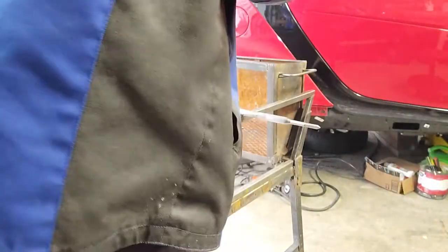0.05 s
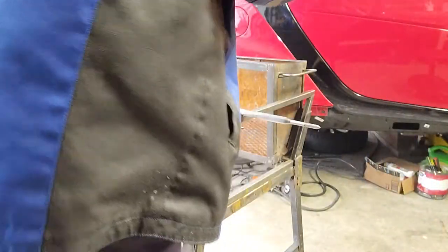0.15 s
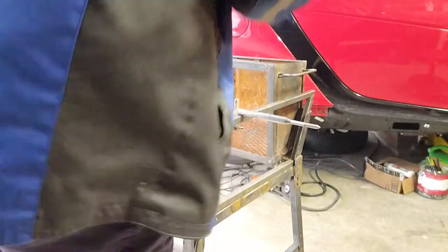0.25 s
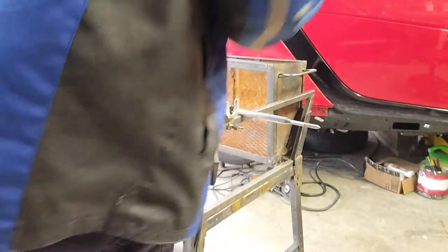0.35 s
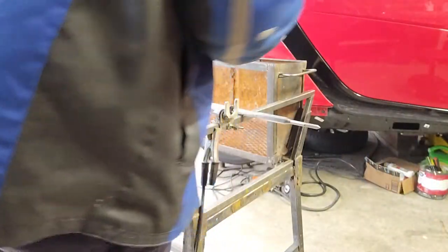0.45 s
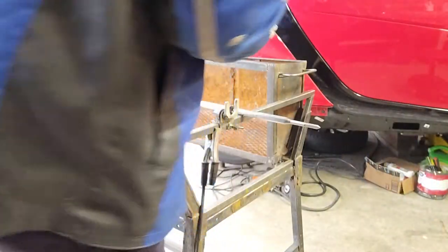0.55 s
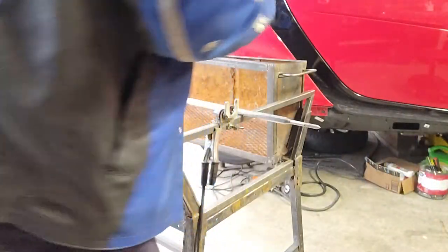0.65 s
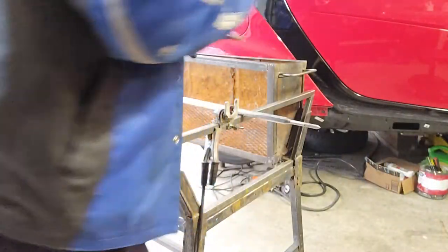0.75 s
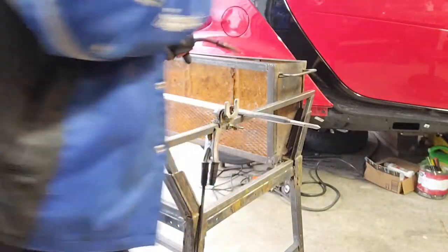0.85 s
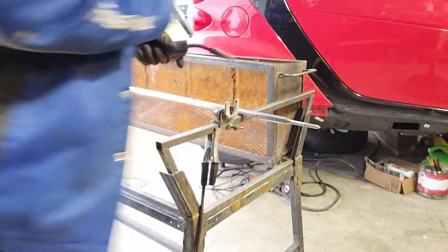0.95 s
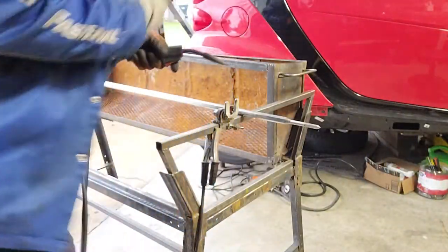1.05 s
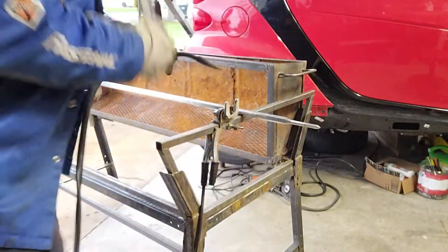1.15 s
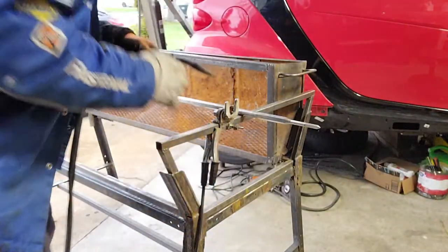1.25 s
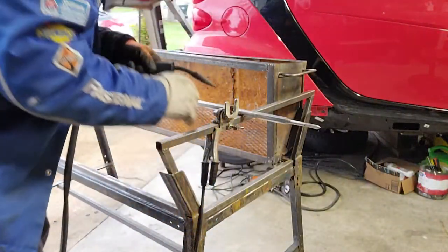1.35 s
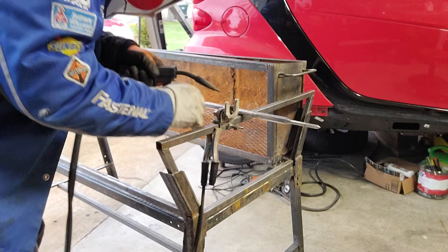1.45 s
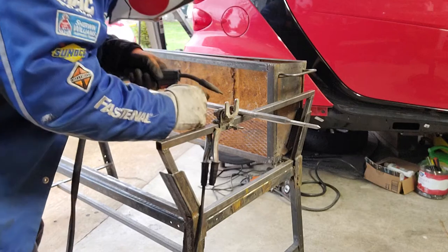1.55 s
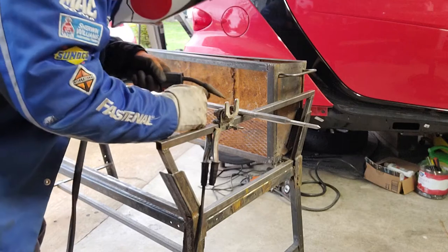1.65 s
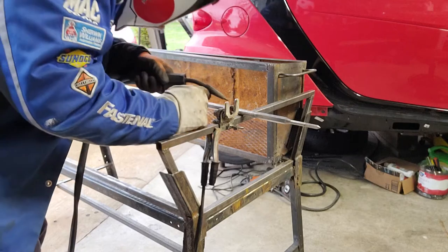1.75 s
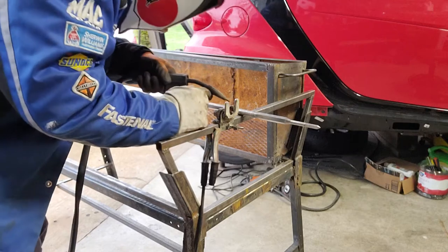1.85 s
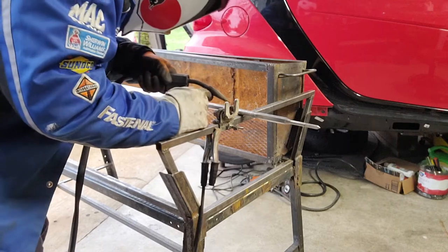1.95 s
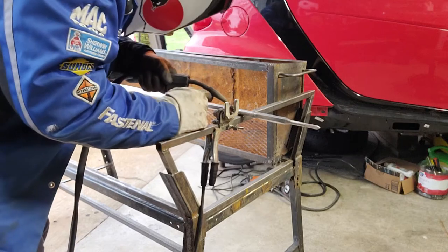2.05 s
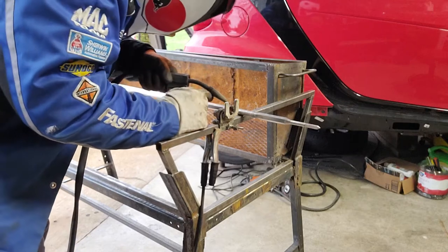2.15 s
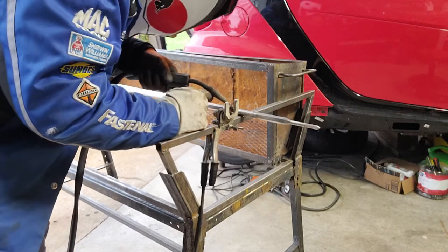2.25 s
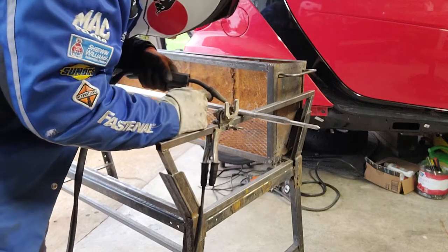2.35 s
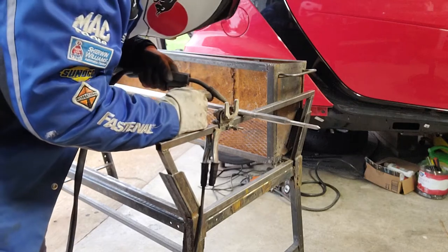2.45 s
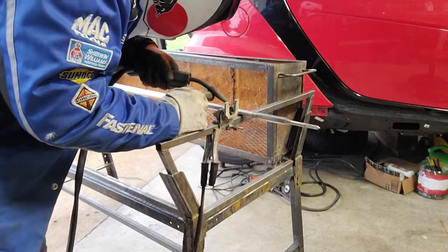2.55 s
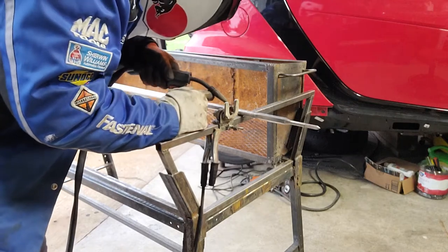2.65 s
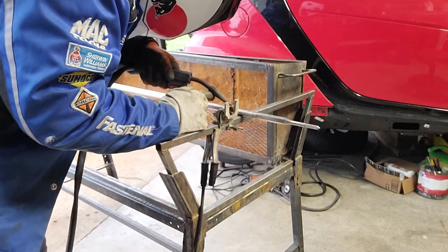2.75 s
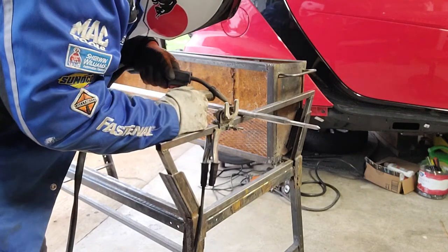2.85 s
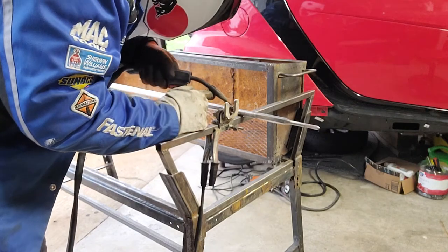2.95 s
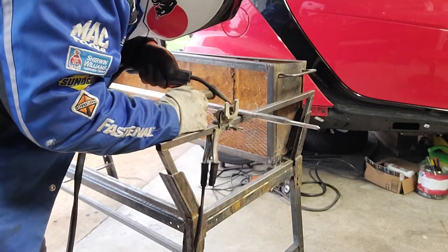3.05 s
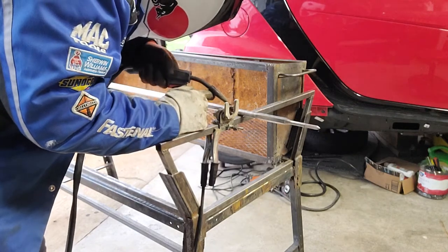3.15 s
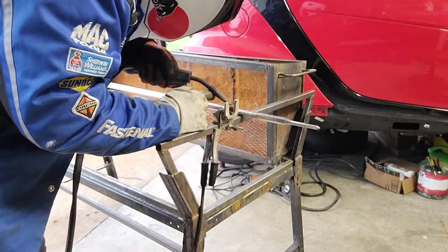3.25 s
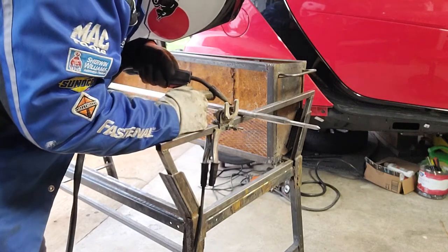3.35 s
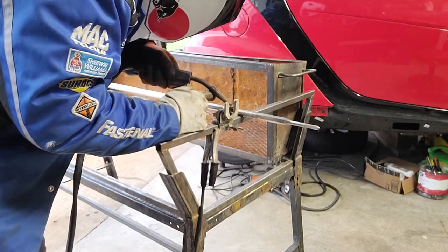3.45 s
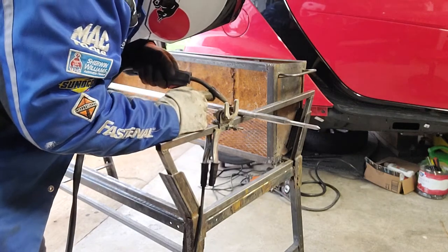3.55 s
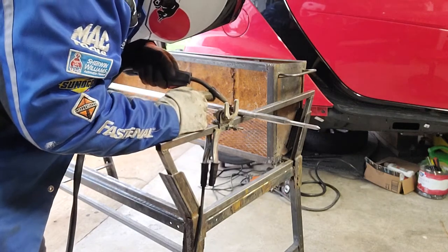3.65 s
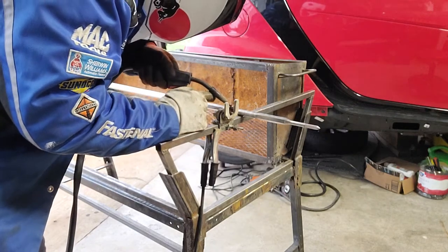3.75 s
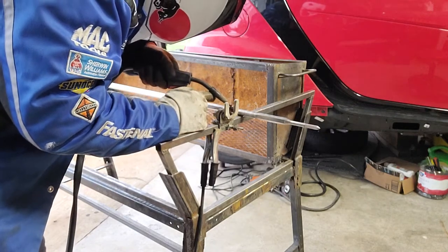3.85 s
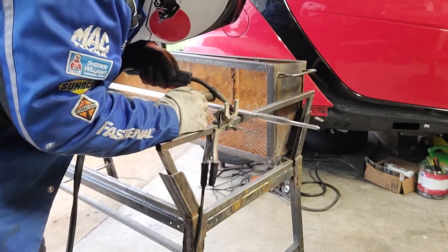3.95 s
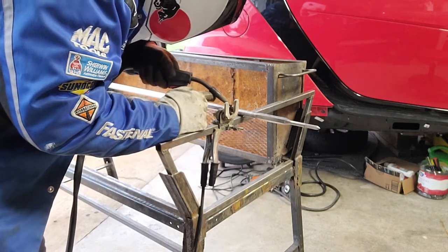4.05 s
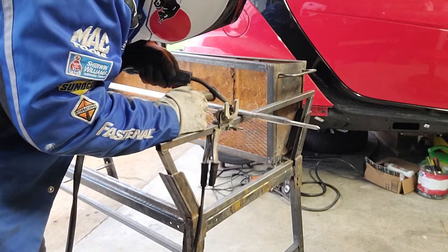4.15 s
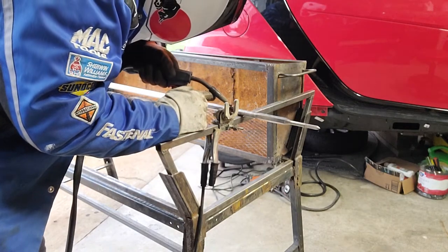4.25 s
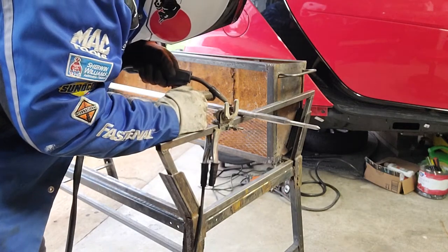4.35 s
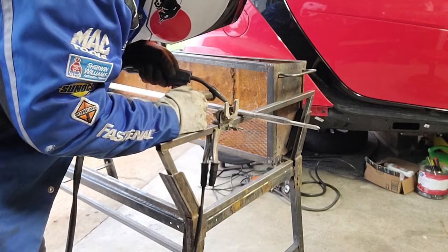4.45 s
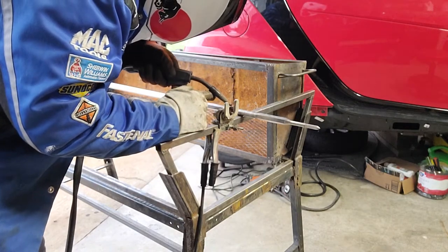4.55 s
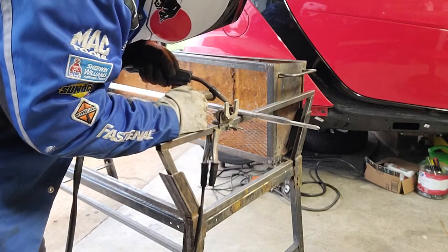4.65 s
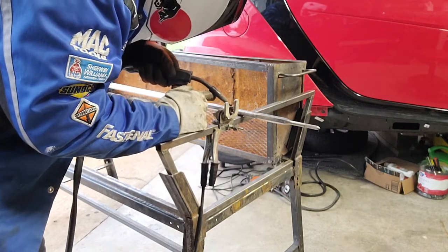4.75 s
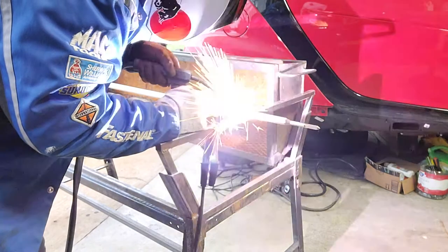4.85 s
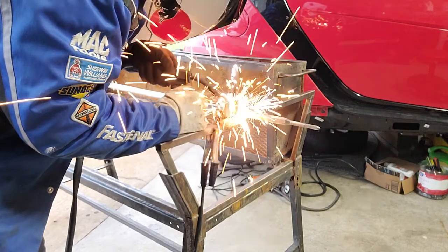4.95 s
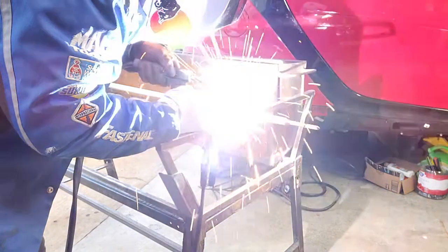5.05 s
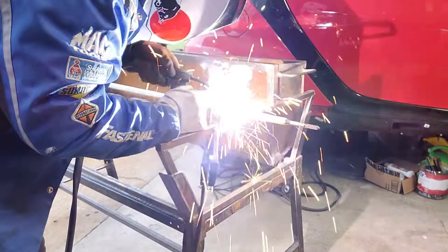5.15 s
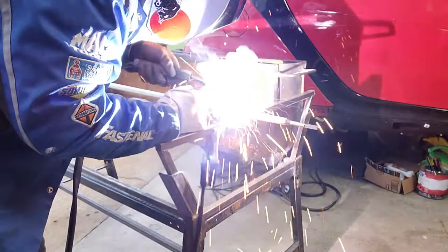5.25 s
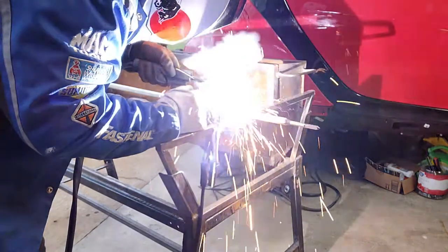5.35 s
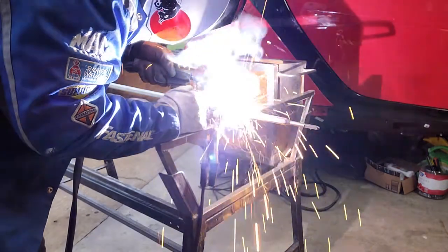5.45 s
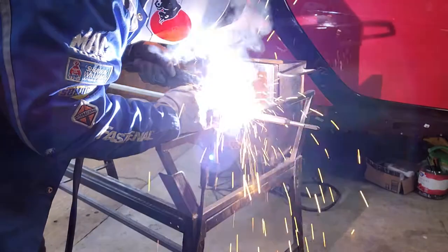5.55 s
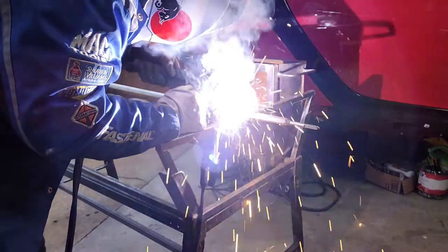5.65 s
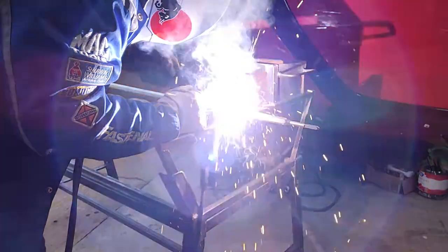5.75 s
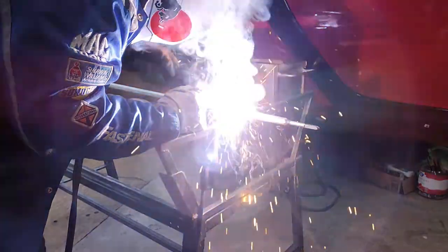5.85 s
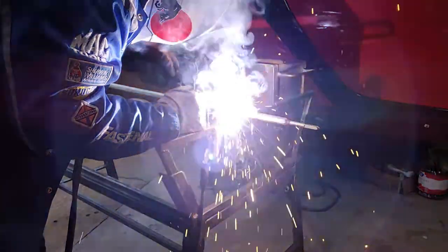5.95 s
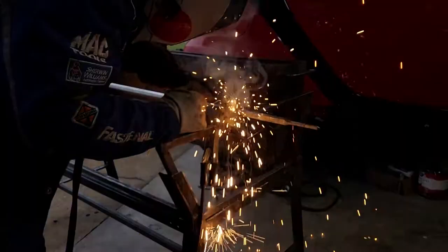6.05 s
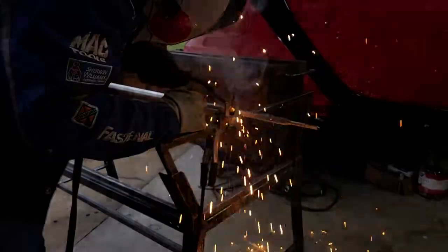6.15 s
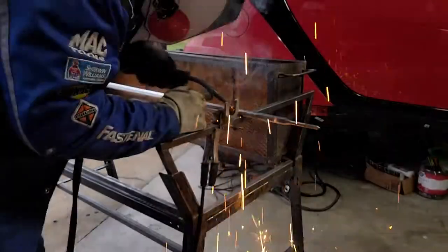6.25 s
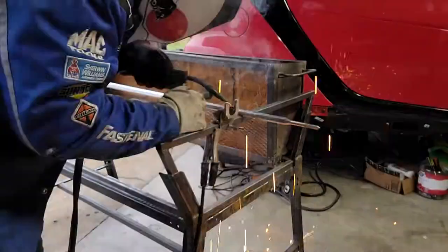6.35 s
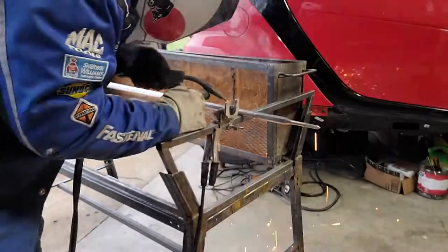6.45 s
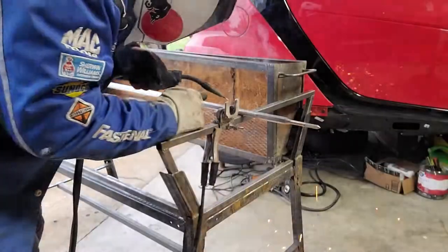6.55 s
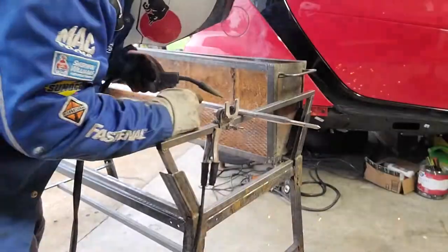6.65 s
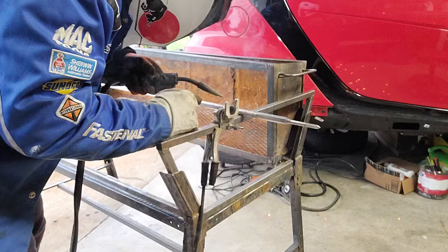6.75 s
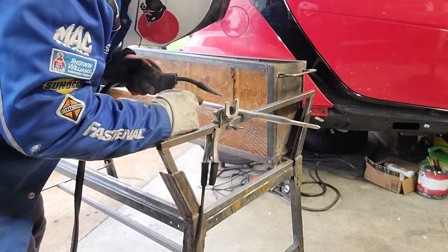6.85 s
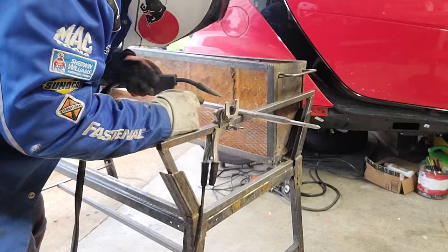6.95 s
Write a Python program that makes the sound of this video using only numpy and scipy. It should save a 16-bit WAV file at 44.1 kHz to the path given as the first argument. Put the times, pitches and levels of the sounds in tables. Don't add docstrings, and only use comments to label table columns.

```python
import sys
import numpy as np
from scipy import signal
from scipy.fft import rfft, irfft, next_fast_len
from scipy.io import wavfile
from scipy.ndimage import uniform_filter1d

SR = 44100
rng = np.random.default_rng(int(sys.argv[2]) if len(sys.argv) > 2 else 0)


def to_wav(s):
    ch = np.atleast_2d(s).T
    pcm = np.round(np.clip(ch, -1, 1) * 32767)
    wavfile.write(sys.argv[1], SR, pcm.astype(np.int16))


def gain_from_db(level_db):
    decades = np.asarray(level_db, float) / 20
    return 10 ** decades


N = 308259

# (time [s], level [dB])
PHONE_GAIN = [
    (0, 1.5),
    (4.85, 1),
    (4.9, 1),
    (5.4, -2.5),
    (6.05, -6),
    (6.99, -4.5),
]
HISS_DB = -66.5
# (time [s], level [dB], upper part relative [dB])
FLOOR_RUMBLE = [
    (0, -58, 1.5),
    (1.3, -52.5, 3),
    (3.6, -60.5, 9.5),
    (4.3, -67, 1),
    (4.7, -67, 2),
    (5.3, -52, 3),
    (6.04, -58.5, 15),
    (6.1, -60, -1),
    (6.99, -71, -5),
]
# (start [s], rise [s], fall
# [s], peak level [dB], upper part relative [dB])
PHONE_JOLTS = [(-.02, 0.017, 0.066, -42, -6), (.2, 0.015, 0.3, -41, -9), (.72, 0.02, 0.093, -47, 11.5),
               (.83, 0.031, 0.14, -52, 17.5), (1.15, 0.032, 0.096, -54, -12), (1.66, 0.027, 0.07, -57, -4),
               (2.02, 0.02, 0.086, -47, 11), (4.28, 0.053, .25, -45, 3.5), (4.66, 0.027, 0.14, -52, 9),
               (4.72, 0.045, 0.25, -41, 3.5), (5.04, 0.045, 0.083, -41, 8), (5.36, 0.014, 0.13, -55, 20.5),
               (5.83, 0.041, 0.12, -57.5, 24.5), (5.99, 0.025, 0.097, -44, -18),
               (6.91, 0.026, .3, -39.5, 1.5)]

ROOM_T60_S, ROOM_DB = .25, -5

SHAFT_HZ = 74.09
FAN_ORDERS = [1, 2, 3, 4, 7, 14, 21, 24, 28, 20, 35, 42, 49, 56, 63]
# (level [dB], left minus right [dB], left lag [ms])
FAN_TONES = [(-64, 0, .3), (-66, 0, .1), (-60.5, 0, .45), (-54, -2, .33), (-64, -5, .5), (-49, -1.5, .41),
             (-55.5, -2, .59), (-53, 4, .54), (-59, 2, .5), (-64, -8, .39), (-72, 2, .55), (-78, 0, .55),
             (-72, 2, .53), (-75, 2, .5), (-77, 2, .52)]
# (time [s], extra lag [ms], negative is shorter)
PASSING_BODY = [
    (0, -.04),
    (.5, -.07),
    (.8, -.06),
    (1.1, 0),
    (6.99, 0),
]
BOUNCE_HZ, BOUNCE_WIDTH_HZ, BOUNCE_DB_PER_MS = 1040, 150, -42
# (frequency [Hz], density [dB per Hz])
AIR_COLOUR = [(15, -85), (25, 0), (182, -13), (304, -0.5), (669, -5.5), (1030, -5.5), (1120, -13),
              (1400, -10), (1780, -14.5), (1930, -18), (2400, -19), (2900, -20), (3600, -22), (4700, -23),
              (6500, -26.5), (9330, -33.5), (15200, -28.5), (16500, -38)]
# (frequency [Hz], left minus right [dB])
AIR_PAN = [(60, -1.5), (110, -1.0), (200, -1.0), (380, -2.0), (700, -3.0), (1290, -2.0), (2380, 1.5),
           (4400, -0.5), (8120, -2.5), (15000, -7.5)]
# (frequency [Hz], share [0-1])
AIR_DIRECT = [(30, .99), (150, .97), (300, .9), (700, .7), (2000, .5), (5000, .35), (15000, .4)]
AIR_DB, FAN_LAG_MS = -43, 0.499

# (start [s], rise [s],
# fall [s], peak level [dB], brightness [0 thud - 3 hiss])
SCUFFS = [(.135, .012, 0.034, -46.5, 2.35), (.185, 0.015, 0.13, -45.5, 2.43), (.826, .003, 0.03, -39, 2.5),
          (.83, 0.024, 0.065, -31.5, 0.23), (.84, 0.02, 0.06, -43, 1.3), (.952, 0.024, 0.042, -42.5, 2.65),
          (.995, 0.026, 0.22, -46.5, 2.53), (1.017, .003, 0.026, -38.5, 1.1),
          (1.1065, 0.002, 0.044, -35, 2.42), (1.11, 0.054, 0.096, -32.5, 2.27),
          (1.118, 0.019, 0.06, -42, 0.85), (4.77, 0.068, .02, -40.5, 1.2), (6.654, .004, 0.028, -52.5, 2.8)]
# (frequency [Hz], width [Hz])
SOLE_RINGS = [(550, 670), (1900, 1400), (3600, 6400), (11500, 11600)]
# (frequency [Hz], width [Hz], level [dB])
SQUEAK_RINGS = [(1580, 120, -3), (2010, 130, 0), (2630, 180, -6), (3060, 170, -9)]
SQUEAK_S, SQUEAK_RISE_S, SQUEAK_FALL_S, SQUEAK_DB = 1.12, 0.019, 0.068, -29.5
# (time [s], peak level [dB], pitch [Hz], decay t60 [s], tick relative [dB])
KNOCKS = [(0.213, -30.5, 204, 0.077, -7), (0.232, -25, 135, 0.016, -7), (0.326, -31.5, 142, 0.03, -6),
          (0.394, -48, 380, 0.034, -3), (0.827, -35.5, 440, 0.072, 8.5), (.836, -35, 600, .04, -2),
          (.867, -34, 730, 0.031, -8), (0.8516, -20, 620, 0.01, -19), (0.858, -29, 457, 0.028, -19),
          (1.018, -33, 796, 0.04, -3), (1.0205, -27, 570, .015, -15), (1.025, -31, 467, 0.06, -10),
          (1.034, -30, 380, 0.015, -15), (1.1071, -35, 500, 0.02, 5), (1.1138, -34, 300, 0.031, -10),
          (1.1345, -27, 2010, .04, -10), (1.141, -27, 1570, .03, -10), (4.672, -36, 230, 0.044, -20),
          (4.677, -32, 139, 0.12, -15), (4.816, -35.5, 305, 0.047, 2), (6.925, -33.5, 59, 0.39, -30),
          (.001, -36, 62.6, .3, -30), (.235, -40, 50, .3, -30), (.388, -38, 70, 0.071, -30),
          (.222, -35, 240, .05, -20), (0.878, -38, 420, .04, -15), (4.77, -39, 75, .15, -30)]
OFF_RING_DB, CONTACT_DB, FALL_DB, FALL_BEND = -9.5, -9, -20.5, 1.48

# (time [s], sizzle level [dB], sag [dB per s], body level [dB])
STRIKES = [(4.852, -19, 260, -36), (4.877, -27, 120, -46), (4.904, -22.5, 236, -32), (4.967, -31, 384, -40),
           (5.0288, -36, 250, -34.5), (5.045, -24.5, -700, -36), (5.059, -22, 150, -31),
           (5.134, -26.5, 148, -32), (5.208, -24.5, 52, -37), (5.265, -26.5, 27, -36.5),
           (5.367, -26, 107, -35.5), (5.42, -27, 250, -38.5), (5.446, -25.5, 9, -35.5),
           (5.514, -26.5, 123, -34), (5.55, -22.5, 600, -44), (5.565, -29, 60, -44), (5.592, -26, 100, -37),
           (5.622, -24, 5, -38.5), (5.638, -25.5, 216, -35.5), (5.692, -25, -40, -37),
           (5.745, -26, 100, -34), (5.778, -32, 77, -33.5), (5.848, -28, 18, -35), (5.904, -25, 66, -33.5),
           (5.955, -29, 5, -32.5), (5.991, -27, 32, -35.5)]
ARC_OFF_S, BODY_OFF_S, FLARE_S = 6.036, 6.03, 0.0021
BODY_SAG = 0.64
CHOKE_DB, CHOKE_S = 2, 0.0089
# (frequency [Hz], level [dB])
SIZZLE_COLOUR = [(1500, -38), (4000, -11.5), (5500, -6), (7400, -3.5), (9000, -7.5), (12000, 1), (14500, 0),
                 (15600, 8), (16500, -16)]
# (frequency [Hz], level [dB])
BODY_COLOUR = [(60, -25.5), (150, -6), (300, 0), (450, -11), (680, -3.5), (950, -2.5), (1100, -8.5),
               (1230, -1.5), (1360, -9), (1500, -0.5), (1860, -5), (2300, -3), (2700, -5.5), (4000, -5.5),
               (8000, -17.5)]
# (time [s], level [dB])
SPITS = [(4.8539, -9), (4.8772, -14.5), (4.887, -15.0), (4.8997, -17), (4.9076, -17), (4.9179, -16.0),
         (4.9686, -15.0), (5.0113, -35), (5.0292, -27), (5.0456, -18), (5.1382, -20.0), (5.166, -14),
         (5.2018, -20.0), (5.2088, -13), (5.2274, -17.0), (5.2393, -15), (5.2646, -20), (5.2686, -17.5),
         (5.287, -17.5), (5.2994, -15), (5.3247, -19), (5.3452, -17.0), (5.3513, -18), (5.3678, -9),
         (5.3744, -10), (5.3877, -16), (5.4005, -19), (5.42, -14), (5.4244, -14.0), (5.444, -15),
         (5.4524, -18), (5.4618, -18), (5.4682, -14.0), (5.4841, -14), (5.51, -14.0), (5.552, -15.0),
         (5.5618, -14), (5.586, -16.0), (5.6106, -18), (5.6227, -23), (5.6481, -15.5), (5.679, -19),
         (5.6913, -18), (5.7021, -12), (5.7117, -16), (5.7297, -15.0), (5.752, -19), (5.7585, -15.0),
         (5.7727, -19), (5.78, -21), (5.7952, -18.5), (5.8183, -17), (5.8348, -16.0), (5.8489, -16.5),
         (5.887, -15), (5.9019, -16), (5.9584, -22), (5.9668, -18.0), (6.016, -17.0), (6.0266, -18.0)]
SPIT_DB, SPIT_S, SPIT_BODY_DB = -5.5, .0005, -10
# (time [s], peak level [dB], thump relative [dB])
CRACKS = [(4.8523, -14, 11), (4.8543, -1, -12), (4.8772, -10, -13), (4.9, -10, -9), (4.9184, -15, -7),
          (4.969, -1, -6.5), (5.0461, -17, -18), (5.0665, -16, -23), (5.2096, -12, -7), (5.2396, -22, -19),
          (5.2689, -18, -19), (5.3517, -10, -6), (5.3681, -4, -4), (5.3749, -9, -1.5), (5.3883, -21, -17),
          (5.4009, -24, -22), (5.4201, -8, -21), (5.4248, -4, -16), (5.4448, -5, -25), (5.4686, -20, -20),
          (5.5528, -14, -25), (5.5621, -7, -13), (5.6485, -6, -23), (5.6917, -2, -28), (5.7116, -12, -21),
          (5.7299, -4, -8.5), (5.759, 0, -19), (5.7955, -13, -16), (5.8185, -5, -20), (5.8491, -7, -10)]
# (time [s], peak level [dB], thump relative [dB], left minus right
# [dB])
POPS = [
    (4.9115, -9, -23, 24),
    (4.9684, -23, -14, 5),
    (5.029, -13, -4, 5),
    (5.139, -10, -1.5, 8),
    (5.1614, -5, -11, 4),
    (5.9264, -4, -21, 5),
    (6.026, -3, -31, 2),
    (5.057, -19, -17, 6),
    (5.5966, -11, -12, 4),
    (5.7013, -18, -12, 3),
]
# (frequency [Hz], level [dB])
SNAP_COLOUR = [(800, -30), (3000, -8.5), (6500, 0), (9000, -1.5), (15000, 6.5), (16500, -15)]
DROPS, DROP_OVER_DB, DROP_THUMP_DB, DROP_PAN_DB = 23, 11, -10.5, 3
# (left delay [ms], right delay [ms], level [dB])
FRAME_ECHOES = [
    (.27, 0.396, -11),
    (.8, 0.65, -35),
    (1.9, 2.3, -10.5),
    (3.1, 2.5, -6),
]


def colour(x, table):
    hz, db = np.transpose(table)
    size = 2048
    log_hz = np.log(np.linspace(1, SR / 2, size // 2 + 1))
    log_gain = np.interp(log_hz, np.log(hz), db) * np.log(10) / 20
    ceps = irfft(log_gain)
    ceps[1:size // 2] *= 2
    ceps[size // 2 + 1:] = 0
    impulse = irfft(np.exp(rfft(ceps)))
    return signal.fftconvolve(np.atleast_2d(x), impulse[None], axes=1)[:, :N]


def band(x, hz, width):
    return signal.lfilter(*signal.iirpeak(hz, hz / width, SR), x)


def unit(x):
    return x / np.sqrt(np.mean(x ** 2))


def delay(x, ms):
    size = next_fast_len(N)
    turn = np.exp(-2j * np.pi * np.fft.rfftfreq(size, 1 / SR) * ms / 1000)
    return irfft(rfft(x, size) * turn, size)[:N]


def walk(rate):
    k = int(SR / rate)
    steps = np.repeat(rng.standard_normal(N // k + 1), k)
    return unit(uniform_filter1d(uniform_filter1d(steps, k), k)[:N])


def grains(rate, spread_db, channels=1):
    hit = rng.random((channels, N)) < rate / SR
    size = np.minimum(rng.exponential(size=(channels, N)), 2.5)
    return unit(hit * rng.choice([-1, 1], (channels, N)) * gain_from_db(spread_db * size))


def curve(table):
    s, *columns = np.transpose(table)
    return [np.interp(np.arange(N) / SR, s, c) for c in columns]


def swell(s, rise, fall):
    out, first = np.zeros(N), max(int(s * SR), 0)
    t = np.arange(first, min(first + int((rise + 3 * fall) * SR), N)) / SR - s
    rise_db = CONTACT_DB * np.clip(1 - t / rise, 0, 1)
    fall_db = FALL_DB * np.clip((t - rise) / fall, 0, 9) ** FALL_BEND
    out[first:first + len(t)] = np.clip(t / 0.00061, 0, 1) * gain_from_db(rise_db + fall_db)
    return out


def room(x):
    t = np.arange(int(.4 * SR)) / SR
    common, apart = rng.standard_normal((2, len(t)))
    apart = signal.sosfilt(signal.butter(2, 400, "high", fs=SR, output="sos"), apart)
    tail = np.array([common + apart, common - apart]) * gain_from_db(-60 * t / ROOM_T60_S) * (t > .0015)
    tail *= gain_from_db(ROOM_DB) / np.sqrt(np.sum(tail ** 2, axis=1, keepdims=True))
    return signal.fftconvolve(tail, x[None], axes=1)[:, :N]


def electronic_hiss():
    noise = rng.standard_normal((2, N))
    return gain_from_db(HISS_DB + np.array([[-3], [3]])) * unit(band(noise, 10800, 2500))


def rumble():
    shake = rng.standard_normal(N) + 0.5 * rng.standard_normal((2, N))
    deep = unit(band(band(shake, 74.0, 100), 74.0, 100))
    upper = unit(band(band(shake, 207, 380), 207, 380))
    db, upper_db = curve(FLOOR_RUMBLE)
    out = gain_from_db(db + 2.2 * walk(6.25)) * (deep + gain_from_db(upper_db - 6) * upper)
    for s, rise, fall, db, upper_db in PHONE_JOLTS:
        out = out + swell(s, rise, fall) * gain_from_db(db) * (deep + gain_from_db(upper_db - 9.0) * upper)
    return out * gain_from_db(np.array([[-.7], [.7]]))


def fan_tones():
    turns = np.cumsum(SHAFT_HZ * (1 + .0004 * walk(1.5))) / SR
    extra_ms, = curve(PASSING_BODY)
    out = np.zeros((2, N))
    for order, (db, pan_db, lag_ms) in zip(FAN_ORDERS, FAN_TONES):
        hz = order * SHAFT_HZ
        left_lag = np.array([[1], [0]]) * hz * (lag_ms + extra_ms) / 1000
        phase = order * turns + rng.random() - left_lag
        wobble_db = (1.3 + 0.032 * order) * np.array([walk(3.79), walk(3.99)])
        bounce_db = BOUNCE_DB_PER_MS * extra_ms * np.exp(-((hz - BOUNCE_HZ) / BOUNCE_WIDTH_HZ) ** 2)
        sides_db = np.array([[pan_db], [-pan_db]]) / 2
        out += np.sqrt(2) * gain_from_db(db + bounce_db + wobble_db + sides_db) * np.sin(2 * np.pi * phase)
    return out


def fan_air():
    hz, share = np.transpose(AIR_DIRECT)
    share = np.clip(share, .01, .99)
    same = rng.standard_normal(N)
    direct = colour([delay(same, FAN_LAG_MS), same], np.c_[hz, 10 * np.log10(share)])
    diffuse = colour(rng.standard_normal((2, N)), np.c_[hz, 10 * np.log10(1 - share)])
    left, right = colour(direct + diffuse, AIR_COLOUR)
    left = colour(left, np.multiply(AIR_PAN, [1, .5]))
    right = colour(right, np.multiply(AIR_PAN, [1, -.5]))
    air = np.vstack([left, right])
    air = air + gain_from_db(1.5) * room(air.mean(axis=0))
    return unit(air) * gain_from_db(AIR_DB + 0.18 * walk(2.23))


def scuffs():
    grit = grains(5000, 1.6, channels=2)
    grit = grit + 0.063 * grit[::-1]
    rings = [unit(band(band(grit, hz, width), hz, width)) for hz, width in SOLE_RINGS]
    out = np.zeros((2, N))
    for s, rise, fall, db, bright in SCUFFS:
        drag = sum(gain_from_db(db + OFF_RING_DB * abs(k - bright)) * ring for k, ring in enumerate(rings))
        out += swell(s, rise, fall) * drag
    squeak = unit(sum(gain_from_db(db) * unit(band(grit, hz, width)) for hz, width, db in SQUEAK_RINGS))
    out += gain_from_db(SQUEAK_DB) * swell(SQUEAK_S, SQUEAK_RISE_S, SQUEAK_FALL_S) * squeak
    return out * gain_from_db(np.array([[1.5], [-1.5]]))


def knocks():
    length = 8192
    out, t = np.zeros(N + length), np.arange(length) / SR
    for s, db, hz, t60, tick_db in KNOCKS:
        decay_db = -60 * t / t60
        ring = np.sin(2 * np.pi * hz * t)
        ring += .5 * np.sin(2 * np.pi * 2.17 * hz * t) * gain_from_db(decay_db)
        ring += gain_from_db(tick_db) * rng.standard_normal(length) * np.exp(-t / 0.0022)
        first = int(s * SR)
        out[first:first + length] += gain_from_db(db + decay_db) * ring
    out = colour(out[:N], [(100, 3.5), (2500, 3), (6000, -14.5), (16000, -22)])[0]
    return out + gain_from_db(2.5) * room(out)


def nearby(x, pan_db):
    left = x + sum(gain_from_db(db) * delay(x, ms) for ms, _, db in FRAME_ECHOES)
    right = delay(x, 0.033) + sum(gain_from_db(db) * delay(x, ms) for _, ms, db in FRAME_ECHOES)
    return np.array([left * gain_from_db(pan_db / 2), right * gain_from_db(-pan_db / 2)])


def arc_levels():
    t = np.arange(N) / SR
    start, flare_db, sag, base_db = np.transpose(STRIKES)
    now = np.clip(np.searchsorted(start, t) - 1, 0, None)
    to_next_s = np.abs(np.append(start[1:], np.inf)[now] - t)
    fallen_db = sag[now] * np.clip(t - start[now], 0, .2)
    fallen_db += CHOKE_DB * np.exp(-to_next_s / CHOKE_S)
    levels = [flare_db[now] - fallen_db, base_db[now] - BODY_SAG * fallen_db]
    return uniform_filter1d(levels, int(FLARE_S * SR))


def arc_gate(off_s):
    t = np.arange(N) / SR
    return np.clip(np.minimum(t - STRIKES[0][0], off_s - t) / 0.00092, 0, 1)


def spit_flares():
    s, db = np.transpose(SPITS)
    hits = np.zeros(N)
    hits[(s * SR).astype(int)] = gain_from_db(db + SPIT_DB)
    keep = np.exp(-1 / (SPIT_S * SR))
    return signal.lfilter([np.e * (1 - keep)], np.convolve([1, -keep], [1, -keep]), hits)


def droplet_bursts(sizzle_db):
    when, size, dull = rng.random((DROPS, 3)).T
    when = STRIKES[0][0] + when * (ARC_OFF_S - STRIKES[0][0])
    peak_db = sizzle_db[(when * SR).astype(int)] + DROP_OVER_DB - 4 * size
    small = np.c_[when, peak_db, DROP_THUMP_DB + 8 * (dull - .5)]
    drops = np.vstack([CRACKS, small])
    drops = np.c_[drops, DROP_PAN_DB * (1 + .6 * rng.standard_normal(len(drops)))]
    clicks = np.zeros((2, 2, N))
    for s, db, thump_db, pan_db in np.vstack([drops, POPS]):
        sides = gain_from_db(db + np.array([pan_db, -pan_db]) / 2)
        clicks[:, :, int(s * SR) - 4] += [sides * gain_from_db(2.5), sides * gain_from_db(thump_db + 2.5)]
    clicks[:, 1] = [delay(c, .045) for c in clicks[:, 1]]
    out = np.zeros((2, N))
    for click, table in zip(clicks, (SNAP_COLOUR, BODY_COLOUR)):
        peak = np.abs(colour(np.arange(N) == 0, table)).max()
        out += colour(click, table) / peak
    return out


def arc():
    sizzle_db, body_db = arc_levels()
    flares = spit_flares()
    flicker = gain_from_db(1.16 * walk(200))
    spit = grains(900, 4.5)[0] + .7 * rng.standard_normal(N)
    sizzle = unit(colour(spit, SIZZLE_COLOUR)[0])
    high = arc_gate(ARC_OFF_S) * flicker * gain_from_db(sizzle_db) * sizzle
    flash = flares * unit(colour(rng.standard_normal(N), SIZZLE_COLOUR)[0])
    crackle = grains(500, 4.6)[0] + .4 * spit + 0.82 * rng.standard_normal(N)
    body_level = np.hypot(flicker * gain_from_db(body_db + 1.6 * walk(40)), gain_from_db(SPIT_BODY_DB) * flares)
    low = arc_gate(BODY_OFF_S) * body_level * unit(colour(crackle, BODY_COLOUR)[0])
    burst = droplet_bursts(sizzle_db)
    echo = gain_from_db(5.5) * room(high + low + .5 * flash)
    steady = gain_from_db(-0.5) * (nearby(high + flash, 4.7) + nearby(low, 5.0) + echo)
    return steady + burst + gain_from_db(4.5) * room(burst.mean(axis=0))


def scene():
    gain_db, = curve(PHONE_GAIN)
    fan = (fan_tones() + fan_air()) * gain_from_db(gain_db)
    return electronic_hiss() + rumble() + fan + scuffs() + knocks() + arc()


def roll_off(x):
    return signal.sosfilt(signal.butter(12, 16990, fs=SR, output="sos"), x)


def record(dry):
    top = signal.ellip(12, .5, 70, 15800, fs=SR, output="sos")
    bass = signal.butter(3, 38, "high", fs=SR, output="sos")
    rounded = 0.77 * np.tanh(dry / 0.91)
    mix = signal.sosfilt(np.vstack([top, bass]), rounded)
    return roll_off(mix)


dry = scene()
out = record(dry)
to_wav(out)
```